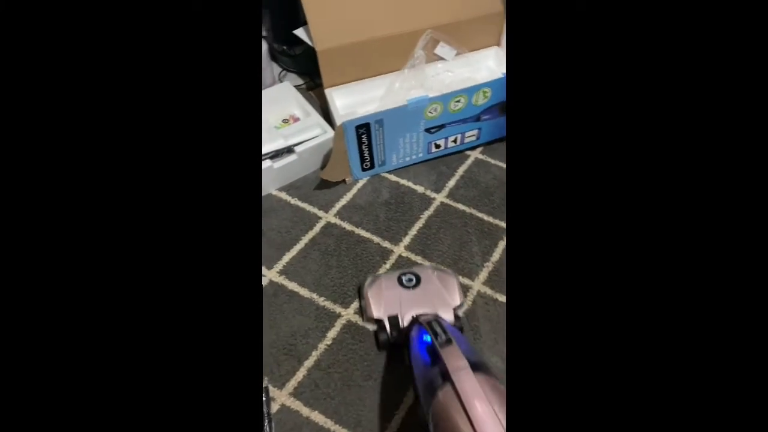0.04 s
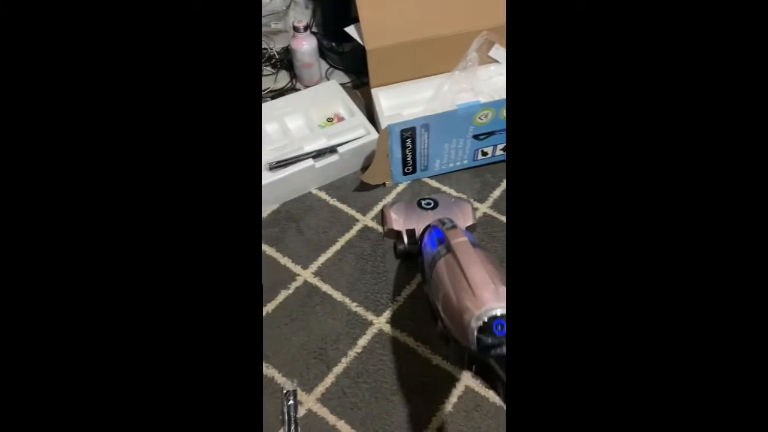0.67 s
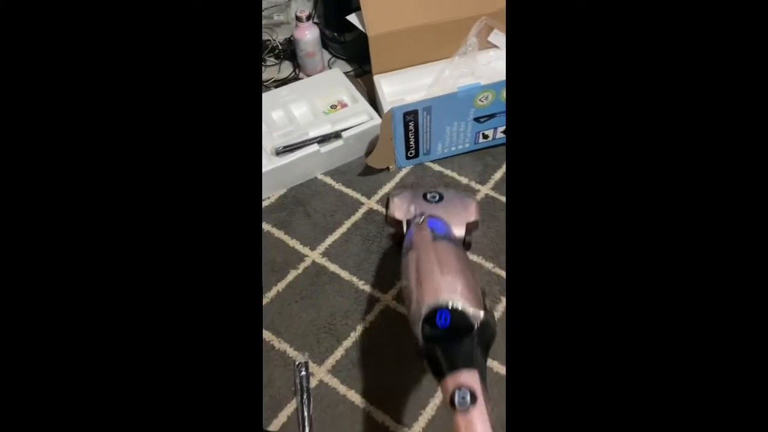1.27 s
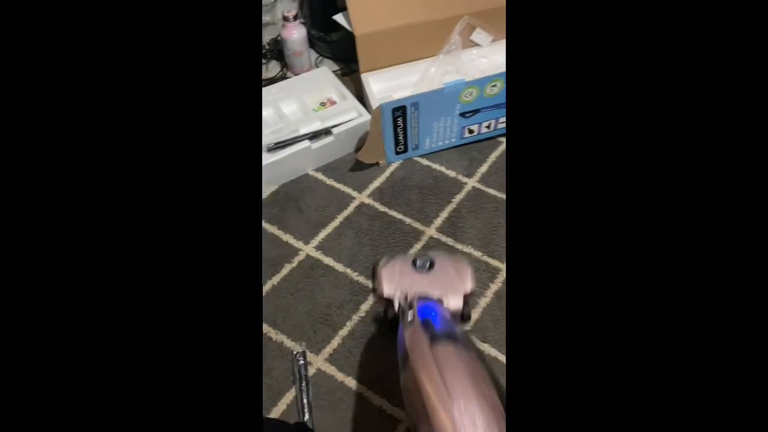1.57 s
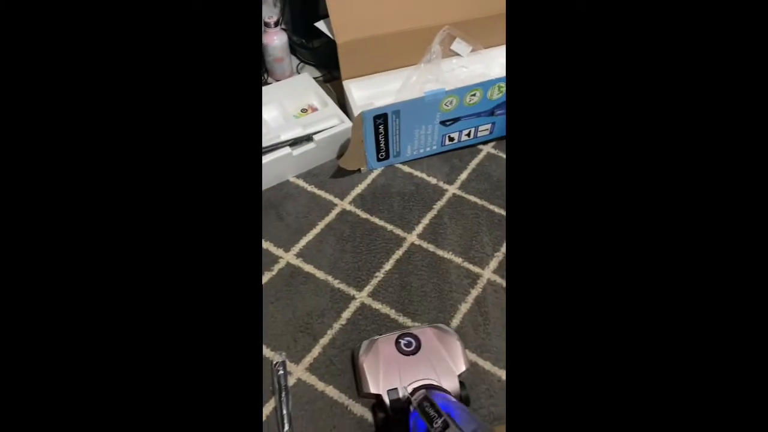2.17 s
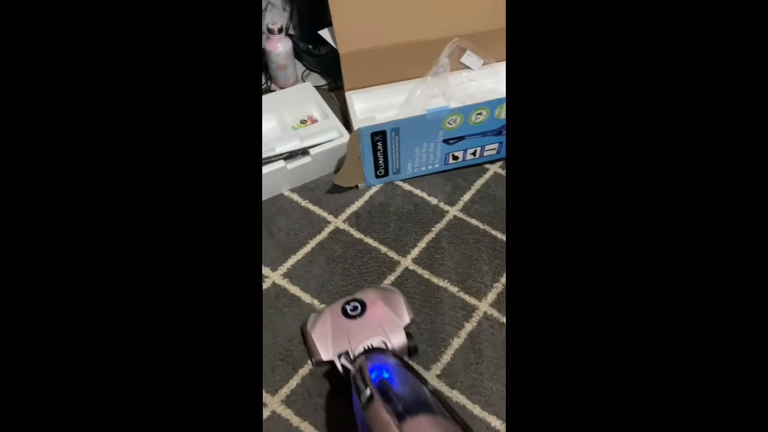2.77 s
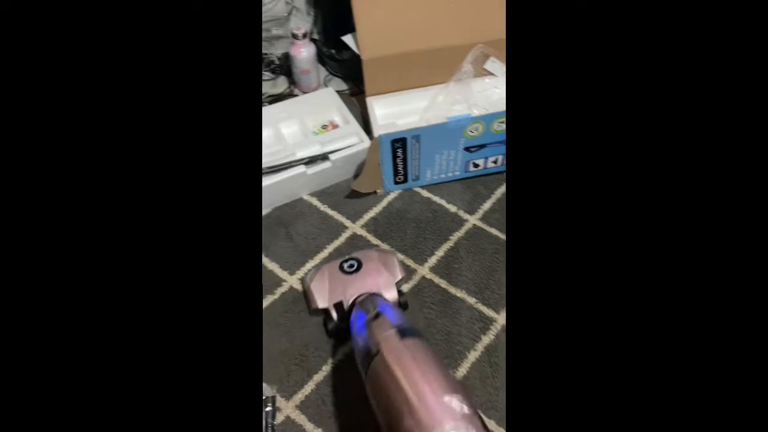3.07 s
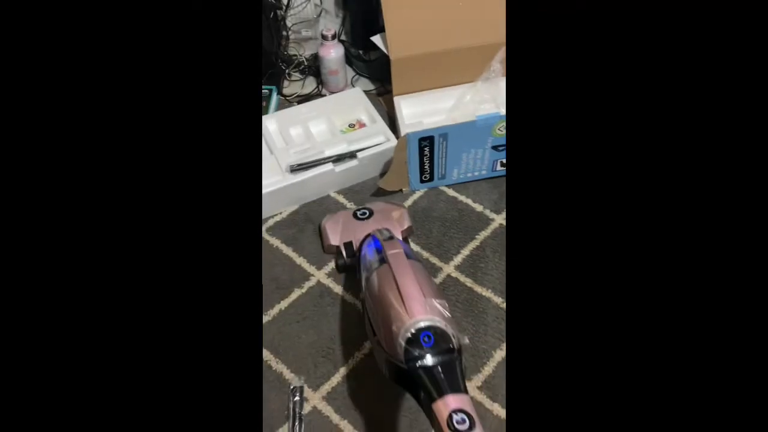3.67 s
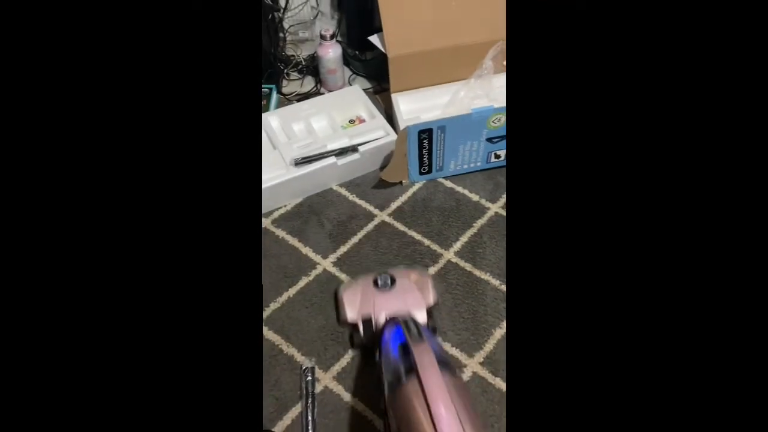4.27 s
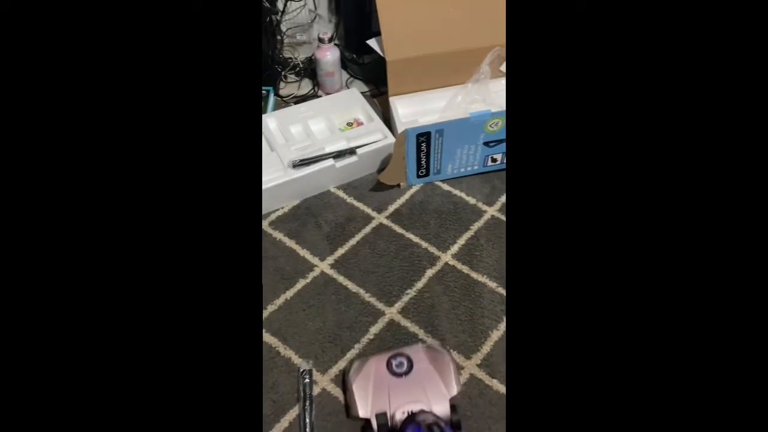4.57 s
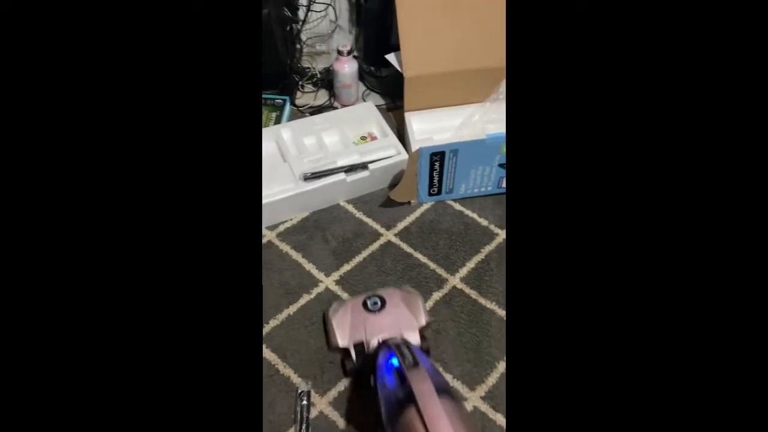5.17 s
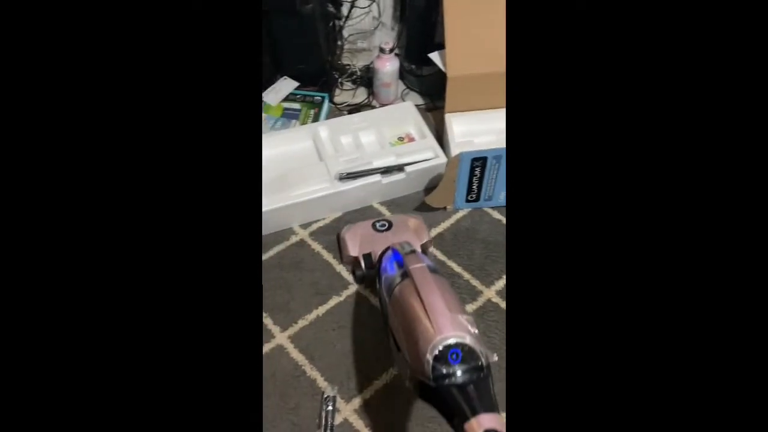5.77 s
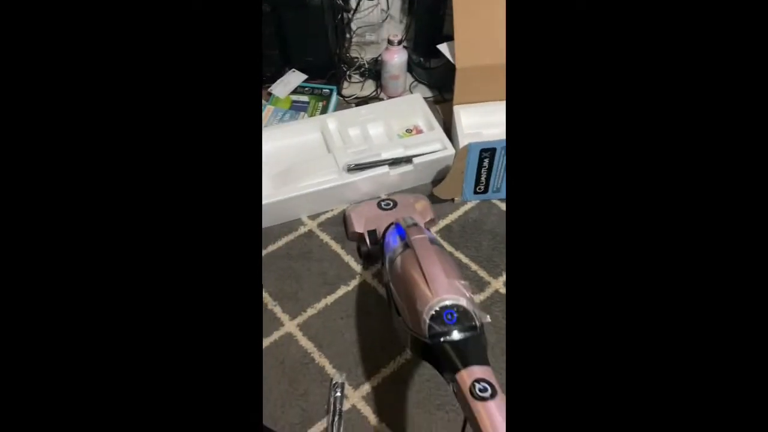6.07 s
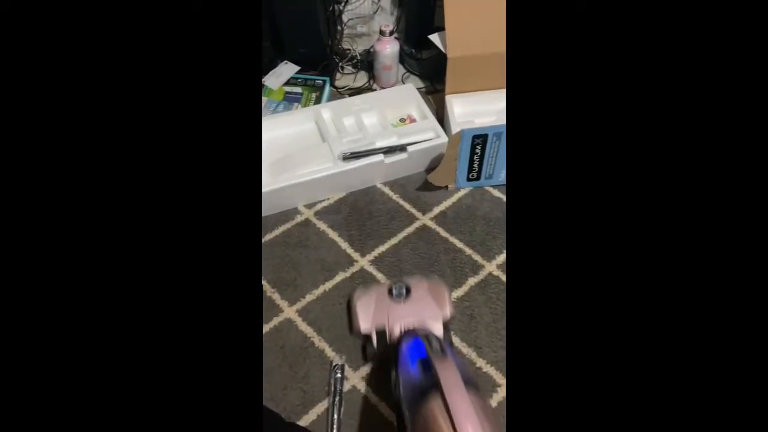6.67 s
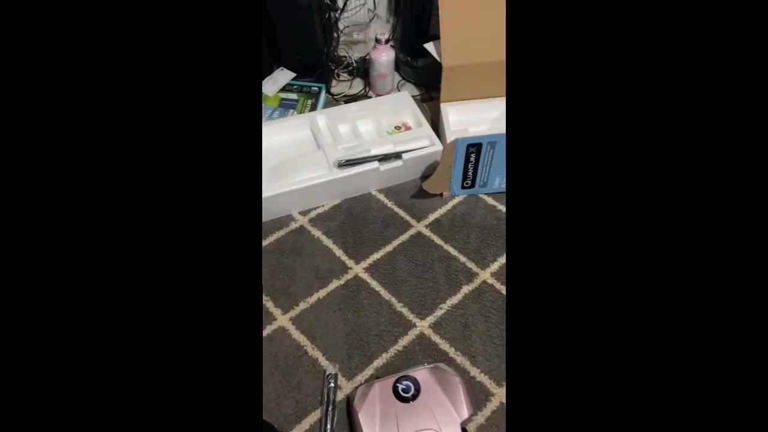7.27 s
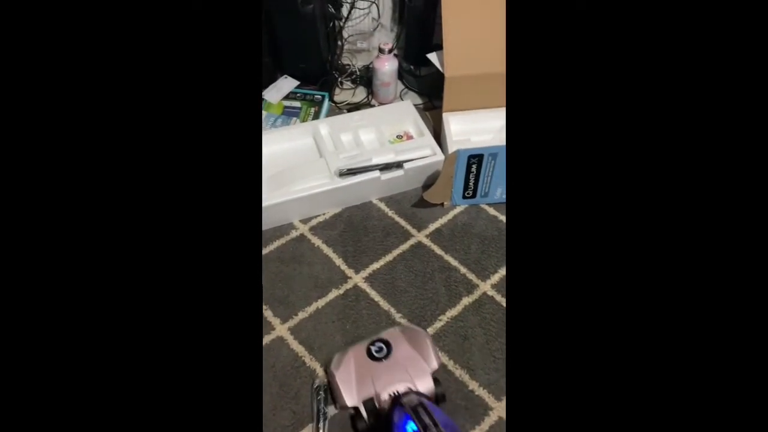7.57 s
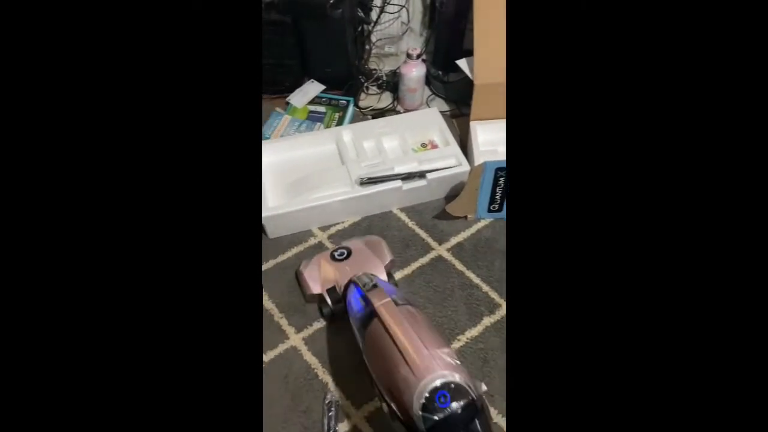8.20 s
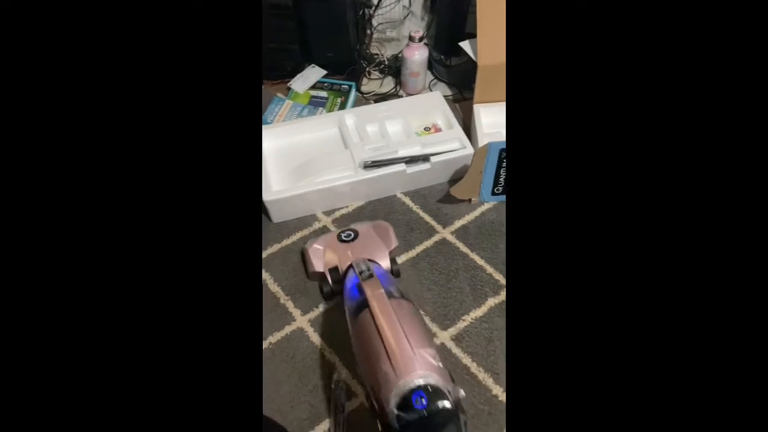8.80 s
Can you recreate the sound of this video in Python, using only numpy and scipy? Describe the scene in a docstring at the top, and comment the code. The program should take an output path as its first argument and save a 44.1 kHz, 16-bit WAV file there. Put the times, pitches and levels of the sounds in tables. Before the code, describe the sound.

An upright vacuum cleaner runs the whole time, close to a hand-held stereo microphone indoors. Its steady roar of air carries a high whine that swells and dips at a constant pitch, above the low rumble of the brush on carpet. The hiss grows slightly as the head is pulled near and eases as it is pushed away. Now and then the nozzle hoots faintly or the head bumps softly on the floor.

```python
"""A steady roar of air with a high whine in it: an upright vacuum cleaner, pushed to and fro over a carpet
close to a hand-held stereo microphone. The fan whines at six times the shaft speed, swelling and fading in
the room's standing waves. The brush roll rumbles on the pile; air rushes through nozzle, duct and exhaust.
Hiss and roar swell as the head is pulled near, duct and exhaust as it is pushed out.
Now and then the nozzle hoots or the head bumps softly on the floor."""
import sys
import numpy as np
from scipy import signal
from scipy.fft import rfft, irfft, next_fast_len
from scipy.io import wavfile
from scipy.ndimage import uniform_filter1d, map_coordinates

SR = 44100
rng = np.random.default_rng(int(sys.argv[2]) if len(sys.argv) > 2 else 0)


def to_wav(s):
    """Save 16-bit WAV."""
    ch = np.atleast_2d(s).T  # columns
    pcm = np.round(np.clip(ch, -1, 1) * 32767)  # PCM
    wavfile.write(sys.argv[1], SR, pcm.astype(np.int16))


N = 398646
BLADES, BLADE_HZ, DRIFT_HZ = 6, 1715.3, 0.4  # the fan's blade-passing tone and its slow drift
STROKE_M, SOUND_M_PER_S = 0.4, 343  # travel of the head from near to far; speed of sound

# The head's distance from the microphone. Each row: time in seconds, reach from 0 (near) to 1 (far).
REACH = [(0, 0.51), (.5, 0.79), (1.1, 0.93), (1.4, 0.88), (1.85, 0.32), (2.5, .17), (3, 0.44), (3.5, 0.79),
         (3.95, 0.91), (4.7, 0.06), (5, 0.24), (5.5, 0.67), (6.2, 1), (6.5, 0.83), (7, .01), (7.3, 0.021),
         (8.25, 0.71), (8.55, 0.99), (9.04, 0.75)]
# How alike the air noise is on left and right. Each row: frequency in Hz, correlation.
LIKENESS = [(100, .999), (300, .99), (600, .96), (1900, .98), (2150, .85), (2500, .35), (3200, .4),
            (4400, .55), (5000, .85), (6200, .8), (7500, .95), (9000, .8), (10500, .95), (12000, .7),
            (13500, .92), (15000, .6)]
# The machine's place in the stereo image. Each row: frequency in Hz, left minus right in dB.
BALANCE = [(150, 0), (450, -1.3), (850, -2), (1300, -1.3), (1700, -.3), (2100, -.7), (3000, 0),
           (4300, -2.5), (5200, 0)]
# The band that the floor's reflection cancels. Each row: reach, centre in Hz.
NOTCH = [(0, 270), (.35, 309), (.55, 503), (.66, 684), (.85, 750), (1, 780)]
# How deep that reflection cuts. Each row: time in seconds, loss in dB.
NOTCH_DEPTH = [(0, 5), (1.5, 2.5), (3.3, 5.5), (6.5, 4.5), (8.2, 1)]

# The head bumps on the carpet. Each row: time in seconds, level in dB.
BUMPS = [(1.87, -38), (2.62, -33), (7.13, -39)]
# Hoots of the nozzle. Each row: middle and half length in seconds, pitch in Hz, glide in Hz per second,
# level in dB.
HOOTS = [(.05, .086, 448, 0, -33), (1.72, 0.11, 569.5, -110, -34), (1.92, 0.091, 449, 3, -36),
         (2.68, .2, 549, 92, -37.5), (2.85, 0.076, 823, 0, -37), (3.8, 0.21, 605, -2, -35.5),
         (4.72, .11, 756, -1, -36), (5.801, 0.14, 595, 28, -37), (6.43, .12, 589, -42, -36),
         (7.22, .2, 754, -3, -33.5), (8.88, 0.11, 585, -40, -35.5)]
# Hollow resonances. Each row: pitch at mid-stroke and width in Hz, level in dB, reach where it is loudest,
# dB lost per unit of reach from there, rise in Hz from near to far, dB gained at one pull a second.
HOLLOWS = [(566.3, 34, -38, 0.63, 4.5, 70, 0), (755.5, 22, -36.5, .01, 27, 10.13, 1)]

# Resonances of the machine's parts. Each row: centre in Hz, width in Hz, relative level in dB.
LIP_MODES = [(3830, 1100, 1.5), (5490, 420, -1.5)]
HOUSING_MODES = [(2061, 264, 0)]
GRILLE_MODES = [(2496, 116, 1), (2770, 70, -3), (3140, 89, -7.5)]
HEAD_MODES = [(58, 8.3, -4.5), (148, 12, -7.5), (183.6, 5.7, -7), (207.2, 13.6, 1), (251.6, 24, 2.5),
              (278, 10.2, 5), (448.6, 29, 2), (509, 20, -8.5)]
# Colours of the air and brush noise. Each row: frequency in Hz, relative density in dB.
DUCT_SPECTRUM = [(600, -13.5), (1100, -5.5), (1400, -8), (1550, 2.5), (1690, 3.5), (1800, -0.5),
                 (1900, -15), (2300, -11), (4000, -73)]
EXHAUST_SPECTRUM = [(1000, -53), (1900, -32), (2200, 6.5), (2450, 3.5), (2900, 3), (3300, -1), (3700, -7),
                    (4400, -14.5), (5000, -13.5), (8000, -73)]
BRUSH_SPECTRUM = [(15, -50), (30, -28), (45, -24), (60, -2.5), (85, -0.5), (150, 1), (270, 1.5), (302, 0),
                  (330, 2.5), (370, -1), (520, 1), (585, -2.5), (660, 2), (750, -3.5), (3000, -84)]
NOZZLE_SPECTRUM = [(300, -33), (660, -15.5), (740, -9), (810, -1), (990, -1.5), (1080, -6.5), (1350, -5),
                   (1800, -14), (4000, -77)]
HISS_SPECTRUM = [(2000, -20), (3400, -2), (4200, -1.8), (4800, -3), (5300, 1), (6300, .3), (7600, -4.2),
                 (9000, -1.9), (10700, -4), (12800, -9), (15500, -13.5)]

# Swells of nozzle roar, hiss and shaft hum. Each row: time in seconds, relative level in dB.
ROAR_LEVEL = [(0.1, -30.5), (.55, -36), (.9, -31), (1.55, -32.5), (2.05, -29.5), (2.35, -32.5), (2.6, -29),
              (3.6, -33.5), (4.25, -32.5), (4.6, -29), (5.2, -30), (5.6, -34.5), (6, -30.5), (7, -29.5),
              (8.1, -31.5), (8.8, -31)]
HISS_LEVEL = [(0.0, -40.5), (1.07, -44), (1.55, -43), (1.68, -42), (2.3, -41), (2.72, -39), (2.9, -41),
              (4.05, -43), (4.2, -41.5), (4.75, -40), (5.76, -42.5), (6.45, -43.5), (7.05, -39),
              (7.55, -40), (8.6, -42), (8.95, -41.5)]
HUM_LEVEL = [(0, -45), (.35, -36.5), (.85, -34), (1.3, -37), (1.8, -36), (2.4, -54), (2.65, -38),
             (3.25, -43), (3.6, -31), (3.9, -42), (4.28, -33), (4.75, -45), (4.95, -37), (5.6, -38.5),
             (6.17, -33), (6.36, -38.5), (6.55, -39), (6.95, -44), (7.6, -39), (9.04, -36.5)]
# Brief surges of the hum. Each row: time in seconds, boost in dB.
HUM_SURGES = [(.36, 11), (1.76, 4), (2.92, 16), (3.12, 14), (5.02, 10), (5.7, 8), (6.2, 6)]
# The whine and its octave in the room's standing waves. Each row: time in seconds, relative level in dB.
WHINE_LEVEL = [(0, -35), (.08, -26.5), (.22, -32), (.31, -25.5), (.56, -27.5), (.67, -26), (.8, -30.5),
               (1.08, -28.5), (1.22, -31), (1.56, -29), (1.64, -40), (1.7, -29), (1.9, -42), (2, -39),
               (2.07, -30.5), (2.18, -33), (2.48, -28.5), (2.88, -34), (2.97, -48), (3.04, -33),
               (3.17, -35), (3.26, -26), (3.38, -26), (3.5, -36), (3.62, -28), (3.94, -27), (4.04, -46),
               (4.11, -27.5), (4.25, -27.5), (4.35, -41), (4.44, -25.5), (4.56, -33), (4.72, -28.5),
               (4.95, -38), (5.04, -29.5), (5.13, -29), (5.2, -43), (5.28, -28.5), (5.4, -31), (5.53, -23),
               (5.64, -36), (5.72, -25), (5.9, -21.5), (6.15, -31.5), (6.33, -26), (6.46, -25), (6.53, -35),
               (6.6, -24), (6.68, -29), (7.15, -27), (7.42, -30), (7.88, -28), (7.98, -40), (8.08, -25.5),
               (8.17, -25.5), (8.26, -40), (8.35, -27), (8.48, -22), (8.78, -23), (8.87, -27), (8.95, -39),
               (9.02, -28.5)]
OCTAVE_LEVEL = [(0, -51), (.8, -56), (2.1, -51), (2.55, -55), (2.75, -46.5), (3.15, -55), (3.29, -46),
                (3.5, -54), (3.95, -60), (4.14, -49), (4.3, -54), (4.95, -46), (5.62, -46.5), (5.88, -60),
                (6.24, -47.5), (6.5, -57), (7.2, -51), (8.05, -57), (8.36, -46), (8.6, -55)]
# The standing waves differ at the microphone's two ports.
# Each row: time in seconds, left minus right in dB at full pan width.
WHINE_PAN = [(0.1, -5), (0.67, 2), (1.79, -3), (2.02, -8), (2.36, 1), (2.94, -8), (2.99, 1.0), (3.26, -1.0),
             (4.21, 3), (4.61, -5), (5.2, -9), (5.3, 2), (6.23, -1), (7.29, -3.5), (8.59, -1.5), (9.04, -2)]


def amp(db):
    """Gain of a level in dB."""
    return 10 ** (np.asarray(db) / 20)


def unit(x):
    """x at rms 1."""
    return x / np.sqrt(np.mean(x ** 2) + 1e-20)


def along(points, hz):
    """(Hz, value) points read on a log axis."""
    knots_hz, values = np.transpose(points)
    return np.interp(np.log(hz + 1), np.log(knots_hz + 1), values)


def curve(rows):
    """One value per sample through (seconds, value) points."""
    return np.interp(np.arange(N) / SR, *np.transpose(rows))


def wobble(rate):
    """A smooth random curve, rate knots a second."""
    knots = rng.standard_normal(int(N * rate / SR) + 4)
    return map_coordinates(knots, [np.arange(N) * rate / SR])


def filtered(x, response):
    """x times a complex response of frequency."""
    size = next_fast_len(N + 8192)
    return irfft(rfft(x, size) * response(np.fft.rfftfreq(size, 1 / SR)), size)[..., :N]


def slope(points):
    """The response of a (Hz, dB) spectrum."""
    return lambda hz: amp(along(points, hz))


def cavity(modes):
    """The response of steep-sided (Hz, width, dB) resonances."""
    return lambda hz: sum(amp(db) / (1 + ((hz - centre) / width) ** 2) ** 2 for centre, width, db in modes)


def rush(response, patchy_db, lag_ms=0, lag_from_hz=0):
    """Turbulent stereo noise of rms 1; above lag_from_hz it reaches the right port lag_ms late."""
    def mid_side(hz):
        angle = np.arccos(np.clip(along(LIKENESS, hz), -1, 1)) / 2
        return response(hz) * np.array([np.cos(angle), np.sin(angle)])

    def lag(hz):
        return np.exp(-2j * np.pi * np.maximum(hz - lag_from_hz, 0) * lag_ms / 1000)

    spectra = signal.stft(rng.standard_normal((2, N)), nperseg=512)[2]
    patches = uniform_filter1d(rng.standard_normal(spectra.shape[1:]), size=5, axis=0)
    patches = unit(uniform_filter1d(patches, size=16, axis=1))
    pair = signal.istft(spectra * amp(patchy_db * patches), nperseg=512)[1][:, :N]
    mid, side = filtered(pair, mid_side)
    return unit(np.array([mid + side, filtered(mid - side, lag)]))


def tone(phase, flutter, flutter_hz):
    """A tone of rms 1, shaken in size and phase by the turbulent inflow."""
    in_phase = (1 + flutter * wobble(flutter_hz)) * np.sin(phase)
    return unit(in_phase + flutter * wobble(flutter_hz) * np.cos(phase))


def reach():
    """How far out the head is, with the turns of the arm rounded."""
    return uniform_filter1d(curve(REACH), size=SR // 4)


def stroke(db, waver_db, far_db=0, forward_db=0, rate=4):
    """Wavering gain: db at mid-stroke, far_db more far than near, forward_db more at one push a second."""
    place = reach()
    speed = np.gradient(place) * SR
    return amp(db + far_db * (place - .5) + forward_db * speed + waver_db * wobble(rate))


def facing(best, fade_db):
    """Gain of an opening that faces the microphone at reach best, fade_db less per unit of reach away."""
    return amp(-fade_db * np.abs(reach() - best))


def standing_waves(rows):
    """The room's broad swells and narrow nulls: (seconds, dB) points joined straight in amplitude."""
    return curve([(s, amp(db)) for s, db in rows])


def bounced(x, near_ms, far_ms, echo_db):
    """x plus one reflection whose delay follows the head: a comb that sweeps with every stroke."""
    delay_ms = near_ms + (far_ms - near_ms) * reach()
    late = np.arange(N) - delay_ms * SR / 1000
    echo = np.array([map_coordinates(side, [late]) for side in x])
    return (x + amp(echo_db) * echo) / np.sqrt(1 + amp(echo_db) ** 2)


def floor_notch(x, width_hz=48):
    """The floor's reflection cancels one band, which climbs as the machine goes out and tilts down."""
    hz, times, spectra = signal.stft(x, SR, nperseg=2048)
    place = np.interp(times, np.arange(N) / SR, reach())
    centre_hz = np.interp(place, *np.transpose(NOTCH))
    depth_db = np.interp(times, *np.transpose(NOTCH_DEPTH))
    notch = np.exp(-((hz[:, None] - centre_hz) / width_hz) ** 2)
    return signal.istft(spectra * amp(-depth_db * notch), nperseg=2048)[1][:, :N]


def bumps(hz=47, half_length_s=0.039):
    """Soft, low thuds of the floor under the head."""
    t = np.arange(N) / SR
    return sum(amp(db) * np.exp(-((t - s) / half_length_s) ** 2) * np.sin(2 * np.pi * hz * (t - s))
               for s, db in BUMPS)


def hoots():
    """A hollow of the nozzle sings out in rough, breathy hoots that swell and fade."""
    out = 0
    for middle_s, half_length_s, hz, glide, db in HOOTS:
        t = np.arange(N) / SR - middle_s
        phase = 2 * np.pi * (hz + glide * t / 2) * t
        swell = amp(db) * np.exp(-(t / half_length_s) ** 2 / 2)
        out = out + swell * tone(phase, flutter=1.8, flutter_hz=44.23)
    return out


def hollows():
    """Two narrow bands of the roar ring, each loudest at its own distance, and rise on every push."""
    out, place = 0, reach()
    for hz, width, db, best, fade_db, glide_hz, pull_db in HOLLOWS:
        gain = amp(db - pull_db * np.gradient(place) * SR) * facing(best, fade_db)
        band = gain * rush(cavity([(hz, width, 0)]), patchy_db=-0.5)
        glide = 2 * np.pi * np.cumsum(glide_hz * (place - .5)) / SR
        analytic = signal.hilbert(band, next_fast_len(N))[:, :N]
        out = out + np.real(analytic * np.exp(1j * glide))
    return out


def lip_rasp():
    """Air rasps under the head's lip, most as a push begins, where the lip faces the microphone."""
    gain = stroke(db=-39, waver_db=-0.1, forward_db=0.5) * facing(best=0.18, fade_db=8)
    return gain * rush(cavity(LIP_MODES), patchy_db=1.7, lag_ms=0.011)


def airflow():
    """Air rushes through duct, fan housing and exhaust grille: housing loudest midway, the rest far out."""
    duct = stroke(db=-31.5, far_db=6, waver_db=-1.1) * rush(slope(DUCT_SPECTRUM), patchy_db=1.4)
    housing_gain = stroke(db=-30, waver_db=-0.6, rate=11) * facing(best=0.44, fade_db=6.5)
    housing = housing_gain * rush(cavity(HOUSING_MODES), patchy_db=1.5, lag_ms=0.009)
    exhaust_gain = stroke(db=-32, far_db=2, waver_db=0.26)
    exhaust = exhaust_gain * rush(slope(EXHAUST_SPECTRUM), patchy_db=1.67, lag_ms=0.015)
    grille_gain = amp(-35) * facing(best=0.85, fade_db=38)
    grille = grille_gain * rush(cavity(GRILLE_MODES), patchy_db=1.5, lag_ms=0.014)
    return bounced(duct + housing + exhaust + grille, near_ms=3.16, far_ms=2.02, echo_db=-21.5)


def floor_head(sway_db=-3.0, hiss_trim_db=3.5):
    """Bristles beat the pile and ring the head; air roars in the nozzle and hisses under its lip."""
    rumble = stroke(db=-29, waver_db=0.5) * rush(slope(BRUSH_SPECTRUM), patchy_db=0.5, lag_ms=0.047)
    ring_gain = stroke(db=-32, far_db=-4.5, waver_db=-0.5, forward_db=-0.3)  # harder on the pull
    ring = ring_gain * rush(cavity(HEAD_MODES), patchy_db=1.5)
    sway = amp(sway_db * np.outer([1, -1], reach() - reach().mean()) / 2)  # slides right as it goes out
    roar = sway * amp(curve(ROAR_LEVEL)) * rush(slope(NOZZLE_SPECTRUM), patchy_db=0.5, lag_ms=0.0083)
    hiss_gain = amp(curve(HISS_LEVEL) + hiss_trim_db)
    hiss = hiss_gain * rush(slope(HISS_SPECTRUM), patchy_db=1.6, lag_ms=.157, lag_from_hz=4250)
    return rumble + ring + bounced(roar + hiss + lip_rasp(), near_ms=4.5, far_ms=3.2, echo_db=-17.5)


def shaft_hum(shaft, trim_db=-0.5, surge_s=0.024):
    """The rough, throbbing hum of the shaft, one cycle a turn."""
    t = np.arange(N) / SR
    surge_db = sum(db * np.exp(-((t - s) / surge_s) ** 2) for s, db in HUM_SURGES)
    gain = amp(curve(HUM_LEVEL) + surge_db + trim_db + 1.7 * wobble(11))
    return gain * tone(shaft + 0.42 * wobble(9), flutter=0.28, flutter_hz=20)


def whine_octave(phase, trim_db=1.5, side_db=-60.0):
    """The thin, clean octave of the whine; its reflections differ from port to port."""
    gain = standing_waves(OCTAVE_LEVEL) * amp(trim_db + 1.8 * wobble(7.4))
    mid = gain * unit(np.sin(phase + 0.34 * wobble(5)))
    side = amp(side_db) * tone(phase + 2 * wobble(2.17), flutter=.5, flutter_hz=7)
    return np.array([mid + side, mid - side])


def motor(spread_db=-20, pan_width=0.75):
    """One shaft drives the hum, the fan's blade-passing whine and its octave."""
    travel_s = STROKE_M * reach() / SOUND_M_PER_S  # the pitch rises a little as the machine comes near
    blade_passes = np.cumsum(BLADE_HZ + DRIFT_HZ * wobble(6)) / SR - BLADE_HZ * travel_s
    shaft = 2 * np.pi * blade_passes / BLADES
    swell = standing_waves(WHINE_LEVEL) * amp(.4 * wobble(14))
    mid = swell * unit(np.sin(BLADES * shaft))
    # reflections reach the two ports with opposite signs and drifting phase
    side = amp(spread_db) * swell * unit(np.cos(BLADES * shaft + wobble(1.594)))
    sway = amp(pan_width * np.outer([1, -1], curve(WHINE_PAN)) / 2)
    whine = sway * np.array([mid + side, mid - side])
    return shaft_hum(shaft) + whine + whine_octave(2 * BLADES * shaft)


def scene():
    """The whole machine on the carpet, close by and a little to the right of the microphone."""
    machine = motor() + floor_notch(floor_head() + hollows() + airflow()) + hoots() + bumps()
    return filtered(machine, lambda hz: amp(np.outer([1, -1], along(BALANCE, hz)) / 2))


def record(dry, low_cut_hz=46, top_hz=15750):
    """The hand-held microphone drops the deepest bass and keeps nothing above its band limit."""
    return filtered(dry, lambda hz: (hz < top_hz) * hz ** 2 / np.sqrt(hz ** 4 + low_cut_hz ** 4))


dry = scene()
out = record(dry)
to_wav(out)
```